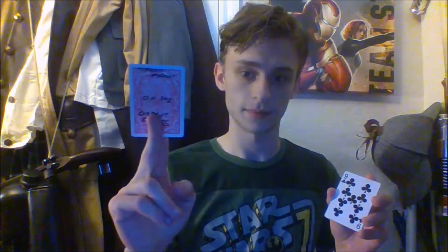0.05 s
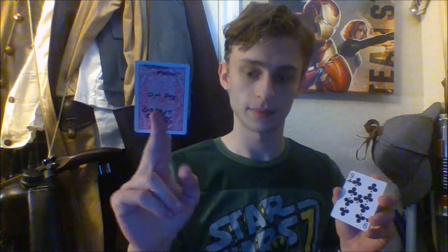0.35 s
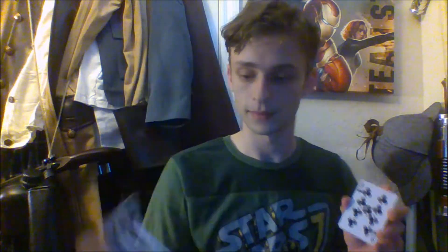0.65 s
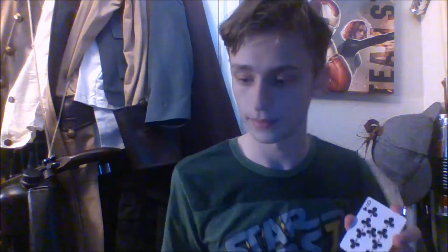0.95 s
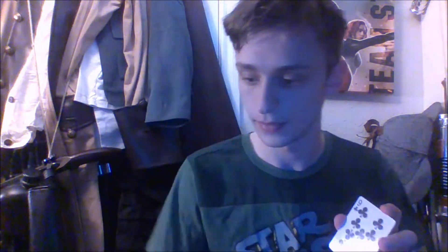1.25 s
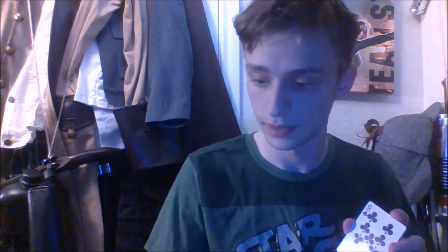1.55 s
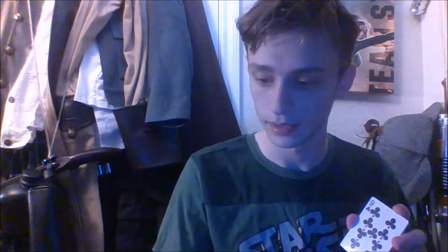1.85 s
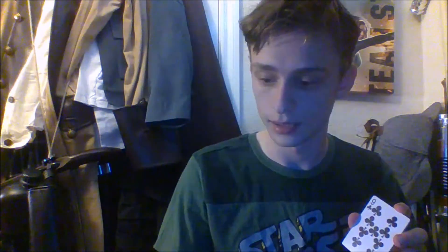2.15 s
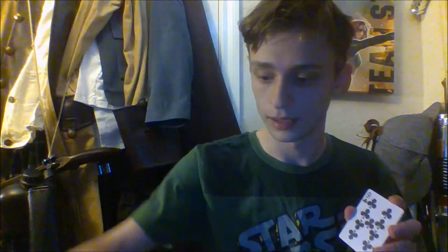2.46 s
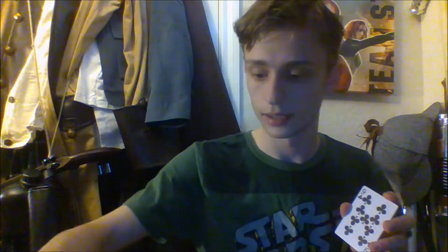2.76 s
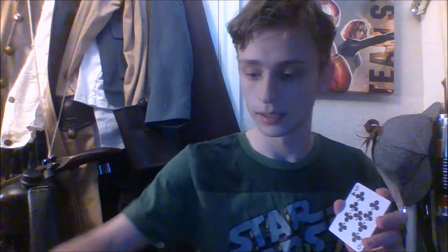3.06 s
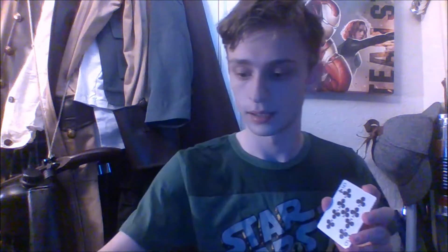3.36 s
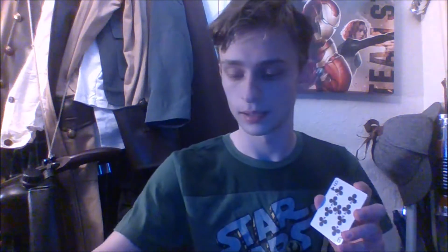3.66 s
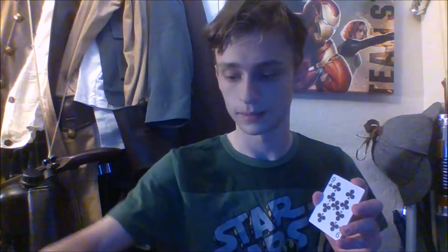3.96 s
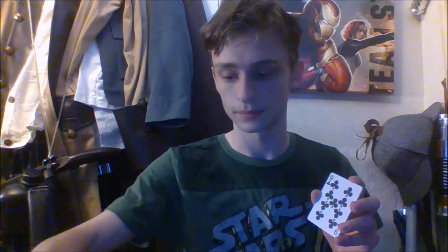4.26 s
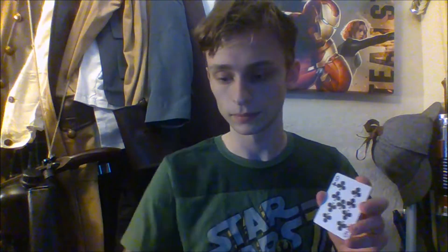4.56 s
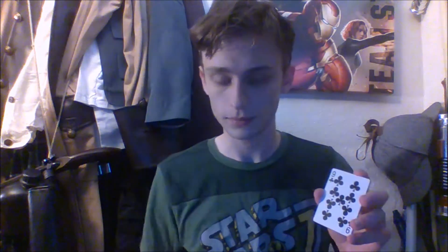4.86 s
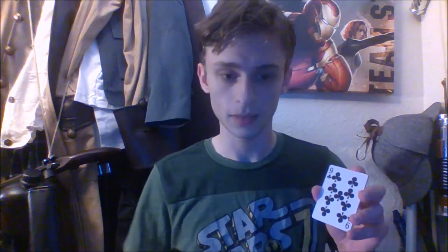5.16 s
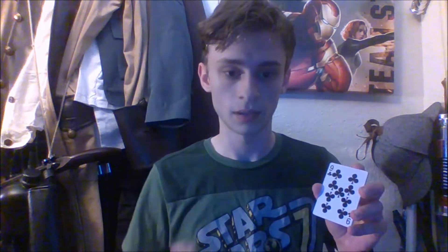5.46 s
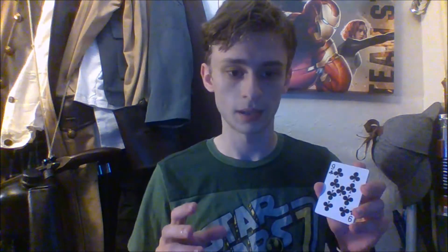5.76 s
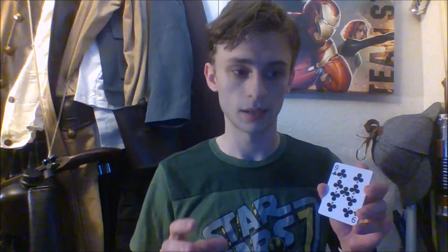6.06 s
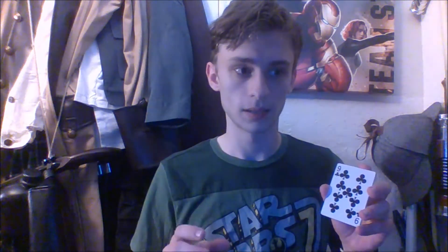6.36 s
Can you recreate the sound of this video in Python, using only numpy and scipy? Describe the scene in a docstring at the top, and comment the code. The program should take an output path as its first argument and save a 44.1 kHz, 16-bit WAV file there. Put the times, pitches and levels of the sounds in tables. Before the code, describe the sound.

Playing cards click and flick softly, then three hard snaps ring against a desk in a quiet room.

```python
"""A desk in a small room, close to a computer's two microphones. A bent playing card springs off a
fingertip, then another clicks and squeaks as it is shifted in the hand. A sleeve rustles faintly
as an arm reaches to the desk. Just past three seconds, three hard snaps set the desk ringing and
wake the room's bass. Near five seconds a card clicks twice. A fan and microphone hiss run throughout."""
import sys
import numpy as np
from scipy.fft import rfft, irfft, next_fast_len
from scipy.io import wavfile
from scipy.ndimage import uniform_filter1d

SR = 44100
rng = np.random.default_rng(int(sys.argv[2]) if len(sys.argv) > 2 else 0)


def persist_wave(psi):
    """Save psi, clipped to +-1, as 16-bit WAV."""
    counts = np.round(np.clip(psi, -1, 1) * 32767).astype(np.int16)
    wavfile.write(sys.argv[1], SR, np.atleast_2d(counts).T)


N = 287532
AGE = np.arange(SR // 2) / SR  # time since a contact, s
SIDE = np.array([[1], [-1]])  # opposite signs for the left and right microphones


def amp(db):
    """Decibels to gain."""
    return 10 ** (np.asarray(db) / 20)


def unit(x):
    """Scale to rms 1."""
    return x / np.sqrt(np.mean(x ** 2) + 1e-20)


def along(points, hz):
    """Read a curve of (freq_hz, value) points on a log frequency axis."""
    freqs, values = np.transpose(points)
    return np.interp(np.log(hz + 1), np.log(freqs + 1), values)


def tilt(db_per_octave, hz):
    """Brightness as a slope in dB, pivoting at 2 kHz and flat in the bass."""
    return db_per_octave * np.log2(np.maximum(hz, 450) / 2000)


def filtered(x, response):
    """Filter x by a response given as a function of frequency."""
    size = x.shape[-1]
    padded = next_fast_len(size + SR // 4)
    hz = np.fft.rfftfreq(padded, 1 / SR)
    return irfft(rfft(x, padded) * response(hz), padded)[..., :size]


def causal(db):
    """The minimum-phase response with these gains: nothing sounds before the blow."""
    cepstrum = irfft(np.log(amp(db)))
    half = len(cepstrum) // 2
    return np.exp(rfft(np.r_[cepstrum[0], 2 * cepstrum[1:half], np.zeros(half)]))


def whitened(x):
    """Level the broad spectrum of a click, keeping its fine comb of reflections."""
    power = uniform_filter1d(np.mean(np.abs(rfft(x)) ** 2, axis=0), size=200)
    bins_hz = np.fft.rfftfreq(x.shape[-1], 1 / SR)
    return filtered(x, lambda hz: causal(-10 * np.log10(np.interp(hz, bins_hz, np.abs(power)))))


def noise(colour):
    """Coloured noise of rms 1."""
    return unit(filtered(rng.standard_normal(N), lambda hz: amp(along(colour, hz))))


def fade(t60):
    """Exponential decay by 60 dB in t60 seconds."""
    return np.exp(-np.log(1000) * AGE / t60)


def add(track, start_s, sound):
    """Mix a half-second sound into the track."""
    start = round(start_s * SR)
    track[:, start:start + len(AGE)] += sound[:, :N - start]


def ring(modes, spread_rad):
    """Damped modes set off by one blow; each reaches the two microphones at different phases."""
    out = 0
    for hz, db, t60, delay in modes:
        phase = .5 * rng.standard_normal() + spread_rad * rng.choice([-1, 1]) * SIDE
        age = np.maximum(AGE - delay, 0)
        swell = 1 - np.exp(-2 * np.pi * hz * age)  # builds within a quarter cycle
        decay = np.exp(-np.log(1000) * age / t60)
        out = out + amp(db) * swell * decay * np.sin(2 * np.pi * hz * age + phase)
    return out


def burst(rise_s, lag_s, direct_t60, near_db, near_t60, room_db, room_t60):
    """A white click of energy 1: sharp contacts, scatter from things nearby, the room's duller tail."""
    grains = rng.standard_normal(len(AGE))
    direct = unit(grains * np.abs(grains)) * fade(direct_t60) / np.sqrt(direct_t60)
    swell = 1 - np.exp(-AGE / rise_s)  # softer contacts build more slowly
    direct = filtered(direct * swell, lambda hz: np.exp(-1j * np.pi * hz * lag_s * SIDE))
    direct = unit(whitened(direct)) * direct.std()
    # reflections are alike at both microphones in the bass and unrelated in the treble
    mid, side = rng.standard_normal((2, len(AGE)))
    angle = lambda hz: np.pi / 4 * hz / (hz + 600)
    mid = filtered(mid, lambda hz: np.cos(angle(hz)))
    side = filtered(side, lambda hz: np.sin(angle(hz)))
    diffuse = mid + SIDE * side
    near = filtered(diffuse, lambda hz: 1 / (1 + (hz / 17000) ** 2)) * fade(near_t60) / np.sqrt(near_t60)
    tail = filtered(diffuse, lambda hz: 1 / (1 + (hz / 7000) ** 4)) * fade(room_t60) / np.sqrt(room_t60)
    click = direct + swell * (amp(near_db) * near + amp(room_db) * tail)
    return unit(whitened(click)) / np.sqrt(len(AGE))


def desk_snaps():
    """Each snap is a crack, a short ring of the struck edge, and the desk's knock over a slow boom."""
    # blows, two of them making up the middle snap: start_s, knock_db, crack_db, fizz_db, edge_db,
    # boom_db, contact_t60_s, scatter_db, left_over_right_db, edge_hz
    blows = [(3.2775, 0.7, 0.8, 0.3, 0, 1.2, 0.0195, -2, 1.4, 1350),
             (3.4342, -9, -16.4, -19, -9.2, -16.5, 0.018, -6.5, 1, 1503),
             (3.4400, 1.5, -9.8, -2, -11, -1.6, 0.016, -5, -0.8, 1485),
             (3.5767, 2.4, 0.3, 4, -6, 0.3, 0.016, -3.5, 3, 1470)]
    # the desk's modes, the lowest arriving last: pitch_hz, level_db, t60_s, delay_s
    desk_modes = [(68, -28, .17, .021), (111.9, -37.5, 0.21, 0.00046), (160, -40, .13, .01),
                  (271, -31.5, 0.051, .007), (415, -29, .07, .004), (504, -34.5, .07, .003),
                  (700, -29, 0.049, 0.0006), (825, -32.5, 0.055, 0.0012), (1087, -26, .045, 0),
                  (1447, -22, .045, 0.0001), (1730.6, -31.5, .05, 0), (1958, -32.5, 0.046, 0),
                  (2270, -29, .035, 0.0002), (3330, -19.5, 0.04, 0), (3820, -28.5, 0.021, 0.00067),
                  (4130, -23, .035, 0.0037), (4915, -22, .033, 0)]
    # the struck edge's modes: pitch_ratio, level_db, t60_s, delay_s
    edge_modes = [(.915, -16.5, 0.04, 0.0019), (1, -13, .045, 0.00056)]
    # colours of the crack and of the room's bass tail: freq_hz, gain_db
    crack_colour = [(100, -5), (260, 4), (330, -8), (420, 9), (900, 11), (1700, 13), (2600, 11.5),
                    (3100, 10), (3500, 16.5), (4100, 12.5), (4550, 12), (4950, 16), (6400, 12), (8000, 4.5),
                    (11000, -2.5), (16000, -10)]
    boom_colour = [(20, -12.5), (45, 1.5), (85, -1.5), (130, -8), (220, -18.5), (400, -39), (1000, -69.5)]
    out = np.zeros((2, N))
    for start, knock_db, crack_db, fizz_db, edge_db, boom_db, hit_t60, near_db, pan_db, edge_hz in blows:
        click = burst(rise_s=.00025, lag_s=.00007, direct_t60=hit_t60,
                      near_db=near_db, near_t60=.053, room_db=-25, room_t60=.22)
        hardness = [(1900, knock_db), (3300, crack_db), (5000, crack_db), (9000, fizz_db)]
        crack = filtered(click, lambda hz: causal(along(crack_colour, hz) + along(hardness, hz)))
        balance = [(6000, pan_db), (10000, -2)]  # the right microphone hears more of the highest treble
        add(out, start, filtered(crack, lambda hz: amp(along(balance, hz) / 2 * SIDE)))
        drive = [(120, boom_db), (270, knock_db), *hardness]
        desk = [(hz, db + along(drive, hz), t60, delay) for hz, db, t60, delay in desk_modes]
        edge = [(ratio * edge_hz, db + edge_db, t60, delay) for ratio, db, t60, delay in edge_modes]
        add(out, start, ring(desk, spread_rad=.49) + ring(edge, spread_rad=.3))
        bass = np.array([noise(boom_colour), noise(boom_colour)])[:, :len(AGE)]
        swell = 1 - np.exp(-AGE / .016)
        add(out, start, amp(boom_db - 49) * bass * swell * fade(t60=.94))
    return out


def card_touch(start_s, db, brightness, colour, ring_hz, ring_db, rise_s, t60, half_width_hz):
    """One touch on a card: a click coloured by the kind of touch, the card and one brief resonance."""
    # the hand's position, as arrival delay between the microphones: time_s, left_lag_s
    hand_path = [(.55, -.00007), (.65, .00005), (5.2, 0)]
    # colours of the card flicked first and of the card held afterwards: freq_hz, gain_db
    flicked_card = [(310, -10), (410, 10), (510, -13), (620, 8), (750, -5.5), (1050, 3.5), (1400, -5.5),
                    (2050, -3), (2500, -5), (3100, -8.5), (3550, 2), (4500, -3), (5300, 3), (7000, 0),
                    (9500, -3.5)]
    held_card = [(450, -1), (1100, 0), (1550, -1), (1850, 4), (2300, -4.5), (2800, 2), (3200, -1),
                 (3600, -3), (4200, -0.5), (5400, -3), (6100, -4.5), (7500, -2.5), (9500, 1), (13000, 6.5),
                 (16000, -2)]
    card = flicked_card if start_s < .62 else held_card
    lag_s = np.interp(start_s, *np.transpose(hand_path))
    click = burst(rise_s, lag_s, direct_t60=t60, near_db=-4, near_t60=.058, room_db=-20.5, room_t60=.25)

    def response(hz):
        peak_db = 10 * np.log10(1 + amp(ring_db) ** 2 / (1 + ((hz - ring_hz) / half_width_hz) ** 2))
        return causal(along(colour, hz) + tilt(brightness, hz) + along(card, hz) + peak_db)
    return amp(db) * filtered(click, response)


def card_flicks():
    """A bent card springs free; the harder the flick, the more its resonance stands out."""
    # releases: start_s, level_db, brightness_db_per_octave, rise_s
    flicks = [(0.3973, -3, 0.5, 0.0011), (.529, -21.5, -0.5, .0003), (.549, -14, 0, 0.0017),
              (.583, -19.5, -3, 0.0018), (.607, -23.5, -5, .007), (5.2497, -5.5, 5.5, 0.00068),
              (5.262, -7, 4.5, 0.00035)]
    # colour of a release: freq_hz, gain_db
    colour = [(120, -8), (450, -0.5), (1100, 0.5), (2300, -1.5), (4600, 3), (8500, -15), (16000, -25)]
    out = np.zeros((2, N))
    for start, db, brightness, rise_s in flicks:
        add(out, start, card_touch(start, db, brightness, colour, ring_hz=1823, ring_db=12 + .5 * db,
                                   rise_s=rise_s, t60=.016, half_width_hz=36))
    return out


def edge_clicks():
    """A card's edge catches and slips with a short, sharp click."""
    # slips: start_s, level_db, brightness_db_per_octave, ring_hz, ring_db
    slips = [(.6535, -13, 1.75, 1445, 10), (1.305, -25, 3.5, 3100, 0), (1.4877, -29.5, -1.5, 3500, 0),
             (1.997, -21, -3.5, 1880, 0), (2.02, -26.5, -.5, 2280, 4), (2.711, -27, 0, 2320, 16),
             (3.859, -36, -1.5, 8000, 14)]
    # colour of a slip: freq_hz, gain_db
    colour = [(120, -6), (450, 2.5), (1100, -1.5), (2300, 0.5), (8500, 0.5), (16000, -8.5)]
    out = np.zeros((2, N))
    for start, db, brightness, ring_hz, ring_db in slips:
        add(out, start, card_touch(start, db, brightness, colour, ring_hz, ring_db,
                                   rise_s=.0002, t60=.006, half_width_hz=40))
    return out


def finger_taps():
    """A fingertip lands on a card and damps it, so the resonance is broad."""
    # landings: start_s, level_db, brightness_db_per_octave, ring_hz, ring_db
    taps = [(.646, -16.5, 4, 2260, 18), (.927, -17, .5, 1250, 1), (1.002, -18, -0.5, 880, 2),
            (1.365, -14.5, 0.5, 820, 1), (2.3322, -24, -4, 1040, 7.5), (3.0042, -26, 1, 2287, 20),
            (4.417, -24.5, -1, 920, 8), (5.0043, -18, 1.5, 1400, 4), (5.049, -21, 2, 1300, 5),
            (5.073, -22, 2, 1830, 13)]
    # colour of a landing: freq_hz, gain_db
    colour = [(120, -10), (450, 1.5), (1100, 1.5), (2300, -6), (4600, -16), (16000, -36)]
    out = np.zeros((2, N))
    for start, db, brightness, ring_hz, ring_db in taps:
        add(out, start, card_touch(start, db, brightness, colour, ring_hz, ring_db,
                                   rise_s=.0015, t60=.022, half_width_hz=99))
    return out


def skin_squeaks():
    """Skin squeaks on card: a tone and its octave swell briefly and die away."""
    # squeaks: start_s, level_db, pitch_hz, t60_s, octave_db
    squeaks = [(2.708, -53, 2310, 0.094, -12), (2.793, -43.5, 777, 0.093, -9), (5.172, -56, 1830, .14, -14)]
    out = np.zeros((2, N))
    for start, db, hz, t60, octave_db in squeaks:
        swell = 1 - np.exp(-AGE / (.13 * t60))
        partials = [(hz, db, t60, 0), (2 * hz, db + octave_db, t60, 0)]
        add(out, start, swell * ring(partials, spread_rad=.22))
    return out


def sleeve_rustle():
    """The sleeve rubs in uneven little catches, in one long movement and in short brushes."""
    # the arm being lowered: time_s, level_db
    reach = [(.42, -80), (.58, -60.5), (.75, -68.5), (.95, -61), (1.2, -65), (1.4, -68), (1.8, -70.5),
             (2.3, -76)]
    # brushes of sleeve and hand: middle_s, level_db, length_s, brightness_db_per_octave
    brushes = [(1.175, -67, 0.13, -3.5), (1.796, -66, 0.037, 2), (2.808, -61.5, 0.053, 0),
               (2.92, -61, 0.065, 0), (3.757, -64.5, 0.039, 2.5), (4.746, -61.5, 0.043, -1.5),
               (5.06, -66.5, 0.13, -2), (5.184, -60, .025, 0)]
    # colour of rubbing cloth: freq_hz, gain_db
    cloth = [(100, -11), (450, -0.5), (900, -0.5), (1500, -3), (2500, -6.5), (6000, -9.5), (16000, -19.5)]
    t = np.arange(N) / SR
    catches = unit(uniform_filter1d(rng.standard_normal(N), size=300))
    friction = noise(cloth) + .63 * np.array([noise(cloth), noise(cloth)])
    rub = amp(1.6 * catches - 3.5) * friction
    out = rub * amp(np.interp(t, *np.transpose(reach), left=-np.inf, right=-np.inf))
    for middle, db, length, brightness in brushes:
        swell = np.exp(-2 * ((t - middle) / length) ** 2)
        out += amp(db) * filtered(rub * swell, lambda hz: amp(tilt(brightness, hz)))
    return out


def body_bumps():
    """The moving body bumps softly: each bump is one low mode that dies away in 16 cycles."""
    # bumps: start_s, level_db, pitch_hz
    bumps = [(.402, -48.5, 138), (0.663, -43.5, 170), (.664, -51, 81), (1.015, -51, 176), (1.111, -45, 61),
             (1.373, -49.5, 144), (2.003, -46.5, 98), (4.307, -50, 54.7), (5.137, -47, 77)]
    out = np.zeros((2, N))
    for start, db, hz in bumps:
        add(out, start, ring([(hz, db, 16 / hz, 0)], spread_rad=.26))
    return out


def room_tone():
    """Room rumble and microphone hiss, part in phase at the two microphones and part opposed."""
    # colours of the in-phase and opposed parts: freq_hz, gain_db
    mid_colour = [(12, -29), (20, 2), (38, -4), (80, -6.5), (116, -11), (266, -19), (491, -24.5),
                  (746, -24.5), (834, -19.5), (1160, -33), (1410, -28), (2270, -32.5), (3170, -32),
                  (3750, -33.5), (15500, -34.5)]
    side_colour = [(12, -29), (20, 2.5), (238, -12.5), (266, -13.5), (597, -21), (811, -21.5),
                   (1720, -28.5), (1870, -25), (2090, -28), (15500, -30)]
    return amp(-60.5) * noise(mid_colour) + amp(-62) * noise(side_colour) * SIDE


def fan():
    """A small fan's rush, coloured by its housing, with thin steady whines."""
    # colour of the housing: freq_hz, gain_db
    housing = [(600, -29), (740, -11), (835, 0), (900, -8), (1100, -6), (1500, -16), (2500, -38)]
    # tones of the fan and electronics: pitch_hz, level_db
    tones = [(839.8, -86.5), (1992, -88.5), (3208, -90), (5992, -97), (8000, -91.5)]
    t = np.arange(N) / SR
    whine = sum(np.sqrt(2) * amp(db) * np.sin(2 * np.pi * hz * t) for hz, db in tones)
    return amp(-76) * noise(housing) + amp(1) * whine


def scene():
    """All sources at the two microphones."""
    return (desk_snaps() + card_flicks() + edge_clicks() + finger_taps() + skin_squeaks()
            + sleeve_rustle() + body_bumps() + room_tone() + fan())


def record(dry):
    """The recorder cuts off steeply at 16 kHz."""
    return filtered(dry, lambda hz: 1 / (1 + (hz / 16000) ** 200))


dry = scene()
out = record(dry)
persist_wave(out)
```